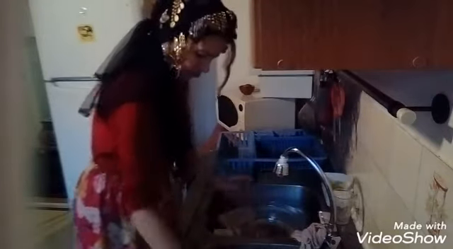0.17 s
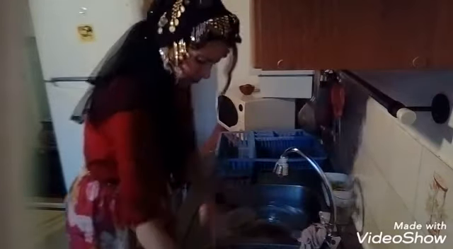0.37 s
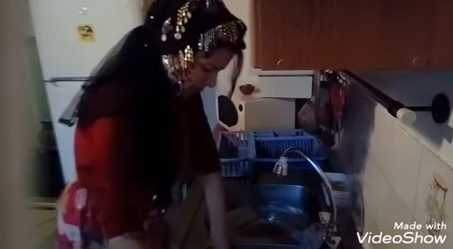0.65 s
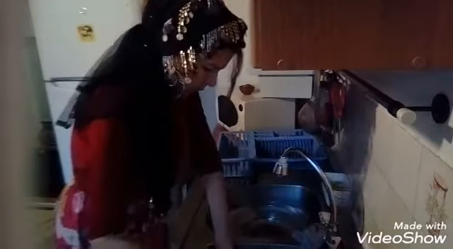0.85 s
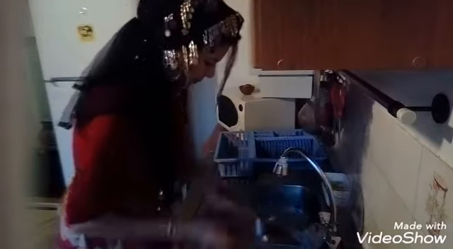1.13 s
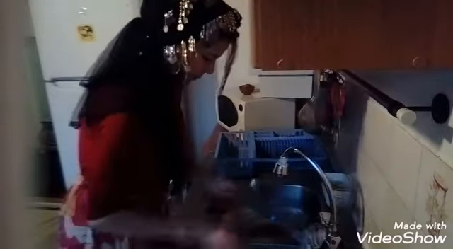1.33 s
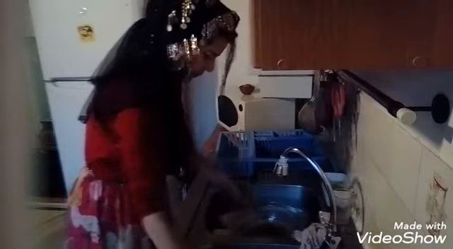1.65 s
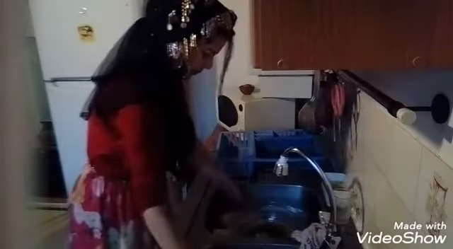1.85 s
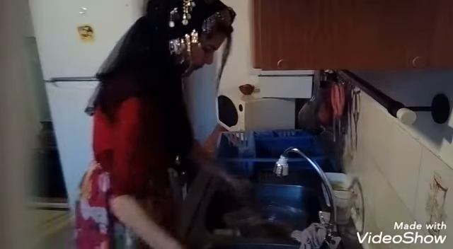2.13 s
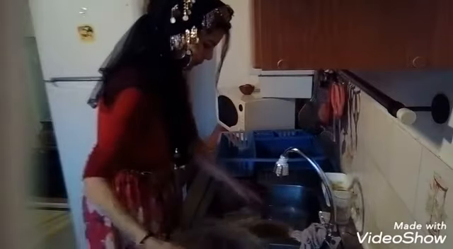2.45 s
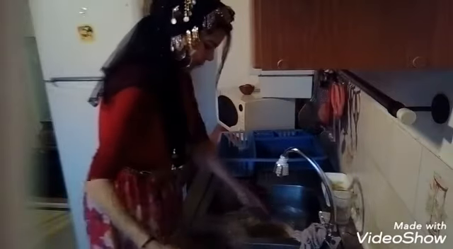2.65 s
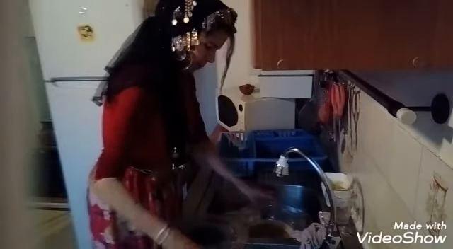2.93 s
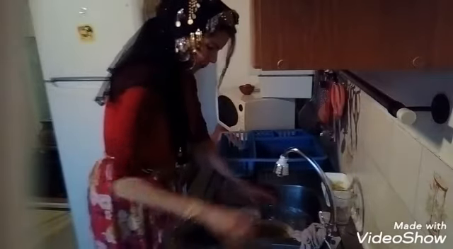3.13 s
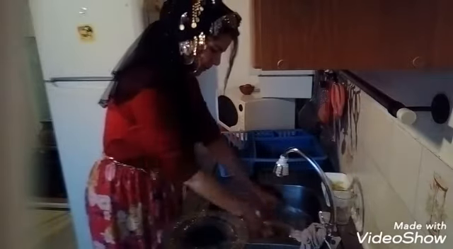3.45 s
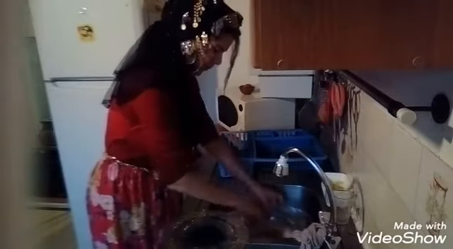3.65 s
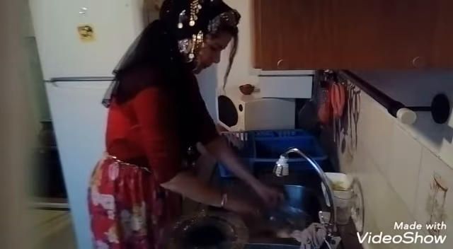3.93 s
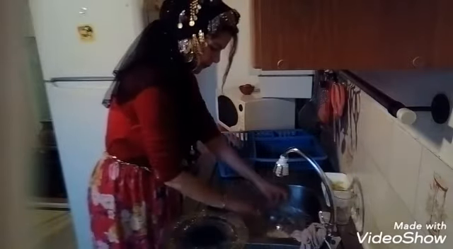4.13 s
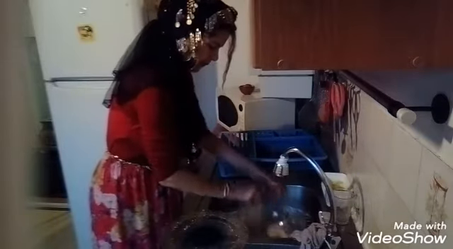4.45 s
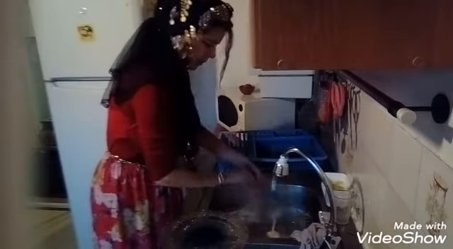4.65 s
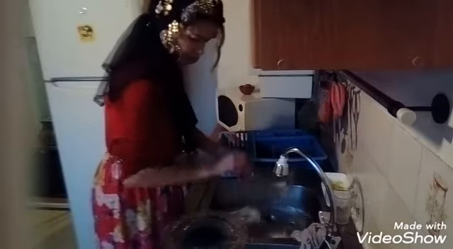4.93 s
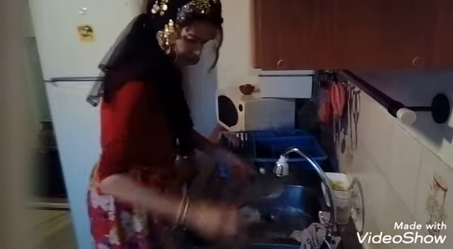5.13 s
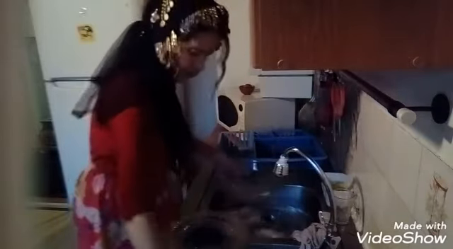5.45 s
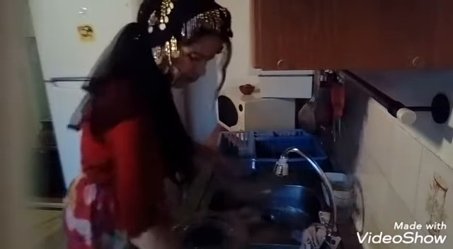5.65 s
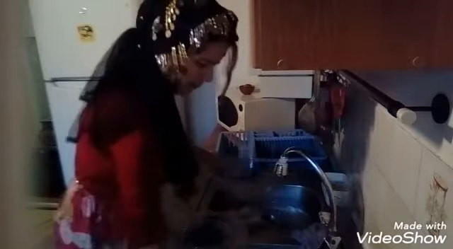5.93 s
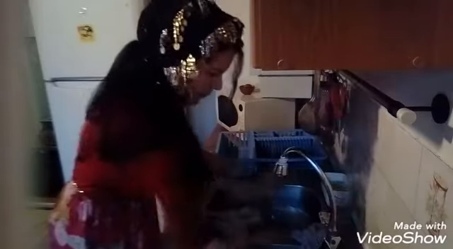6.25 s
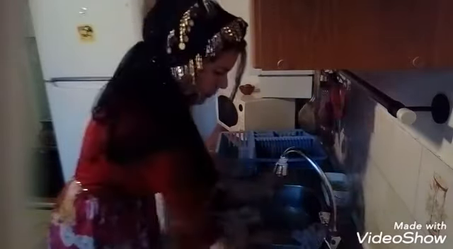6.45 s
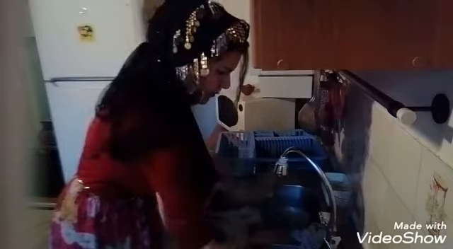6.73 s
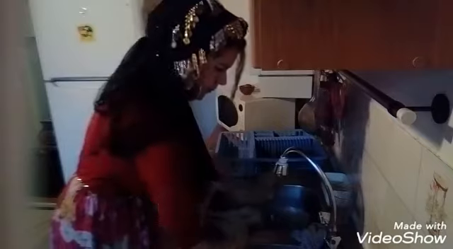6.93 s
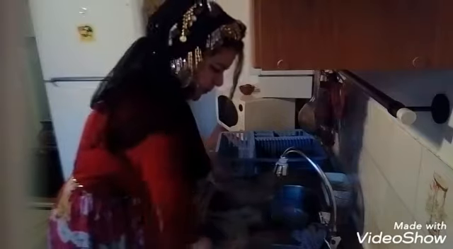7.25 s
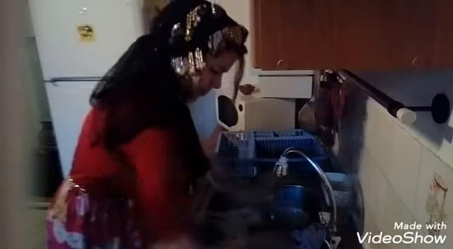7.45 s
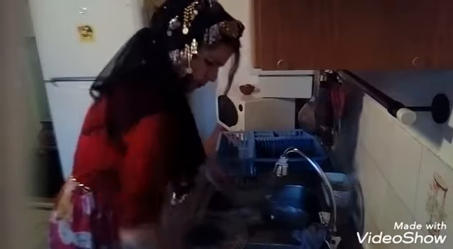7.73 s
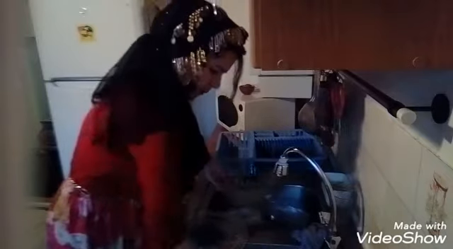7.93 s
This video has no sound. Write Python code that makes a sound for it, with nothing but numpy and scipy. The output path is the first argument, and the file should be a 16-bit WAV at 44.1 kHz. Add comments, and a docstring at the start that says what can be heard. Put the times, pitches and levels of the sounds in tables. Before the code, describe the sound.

Hand dishwashing in a small kitchen: sharp crashes and bright clinks in a metal basin, then muffled lid and cup knocks and quiet rubbing.

```python
"""Dishes are washed by hand in a metal sink in a small tiled kitchen.
Plates, a pot and cutlery are put down in clattering bursts: cracks of noise plus the ringing of each piece.
Light knocks and soft wiping follow, made of dull contacts and of countless tiny slips.
Fading noise makes the room ring briefly after every blow; a refrigerator hums underneath, as sine tones."""
import sys
import numpy as np
from scipy import signal
from scipy.io import wavfile
from scipy.ndimage import uniform_filter1d

SR = 44100
rng = np.random.default_rng(int(sys.argv[2]) if len(sys.argv) > 2 else 0)


def wav_record(signal):
    """Record a signal, one row per channel, as 16-bit PCM in the file named by sys.argv[1]."""
    frames = np.transpose(np.atleast_2d(signal))
    bounded = np.clip(frames, -1, 1)
    # unit amplitude maps onto the largest positive 16-bit level
    quanta = np.round(bounded * 32767).astype(np.int16)
    wavfile.write(sys.argv[1], SR, quanta)


N = 356328  # length in samples, about 8 s

# heavy ware dropped into the sink, where it rocks to rest;
# body shapes the first contact only, thud and ring also set the rebounds:
# start_s, level_db, basin_thud_db, body_hz, first_rebound_db (over level), piece, ring_db (over level)
HEAVY_DROPS = [(.007, -19, 12.5, 1130, -0.5, "plate", -9.5), (.206, -17, 11, 3600, -7, "saucer", -13.5),
               (2.842, -17.5, 14, 670, -5.5, "pot", -6), (3.075, -18, 13.5, 2980, -4, "pot", -20.5)]
# the wait before the first rebound, and the factor that shortens each further wait
REBOUND_S, REBOUND_SHRINK = 0.029, 0.8
# per rebound: level lost after the first one, and treble limit factor; the thud loss is the same for all
REBOUND_LOSS_DB, REBOUND_DULLING, REBOUND_THUD_LOSS_DB = 1, 0.64, 6


def drops(corner_hz=3900, dull_db=-0.5):
    """Each dropped piece cracks on the sink and rebounds three times, ringing anew at every contact."""
    out = np.zeros(N)
    for s, db, thud_db, body_hz, rebound_db, piece, ring_db in HEAVY_DROPS:
        first = blow(corner_hz, thud_db, crack_db=3.5, body_hz=body_hz, body_db=6.0,
                     crack_t60=0.058, push_db=21.5, tail_db=-7.5, clack_tail_db=-8)
        add(out, s, amp(db) * first)
        add(out, s, amp(db + ring_db) * ring(WARE_MODES[piece], spot_db=1.0))
        for k in range(3):
            # rebounds come sooner, weaker and duller one after another
            s += REBOUND_S * REBOUND_SHRINK ** k
            level = db + rebound_db - k * REBOUND_LOSS_DB
            contact = blow(corner_hz * REBOUND_DULLING ** (k + 1), thud_db - REBOUND_THUD_LOSS_DB,
                           crack_db=7.5, body_hz=1250, body_db=5.5, push_db=12,
                           tail_db=-6, clack_tail_db=-7, rise=0.0027)
            ringing = ring(WARE_MODES[piece], spot_db=-6.6)
            add(out, s, amp(level + dull_db) * contact + amp(level + ring_db) * ringing)
    return out


# crockery and pots set against each other or the sink:
# start_s, level_db, corner_hz (treble limit), basin_thud_db, body_hz, piece, ring_db (over the level)
FIRM_CLACKS = [(.541, -49, 7000, 10, 2930, "saucer", -20), (.69, -42.5, 3100, 21, 776, "basin", -13),
               (.716, -39, 5000, 13, 790, "basin", 6), (1.647, -20.5, 6000, 0, 2260, "glass", -11.5),
               (1.824, -24, 9100, 21, 2840, "basin", 2.5), (1.906, -20, 3000, 1.5, 850, "pot", -18.5),
               (1.985, -18.5, 3400, 11.5, 1280, "bowl", -7), (2.348, -24.5, 4070, -4, 526, "forks", -30),
               (2.466, -34.5, 3160, 2, 1500, "bowl", -5), (2.578, -30, 4500, 2, 2000, "saucer", -13.5),
               (2.824, -28.5, 3900, 29, 3750, "basin", -6.5), (5.438, -48, 5500, -3, 1500, "glass", -16),
               (5.452, -38, 4200, 14.5, 1050, "counter", 3), (6.114, -38, 950, 10, 650, "pan", -2.5),
               (7.46, -39.5, 2600, 7, 770, "counter", 1.5), (7.719, -51, 3000, 23, 754, "pot", -6),
               (8.003, -36, 775, 5, 420, "counter", 1)]


def clacks():
    """One firm contact, after which the piece rings on."""
    out = np.zeros(N)
    for s, db, corner_hz, thud_db, body_hz, piece, ring_db in FIRM_CLACKS:
        contact = blow(corner_hz, thud_db, crack_db=5.5, body_hz=body_hz, body_db=8, crack_t60=0.042,
                       shards_db=-6.5, noise_db=-6, push_db=15.5, tail_db=-5.5, clack_tail_db=-6.5)
        ringing = ring(WARE_MODES[piece], spot_db=1.5)
        add(out, s, amp(db) * (contact + amp(ring_db) * ringing))
    return out


# hard, bright contacts of cutlery:
# start_s, level_db (before the trim), basin_thud_db, body_hz, piece, ring_db (over the level)
CUTLERY_HITS = [(0.656, -48.5, -6, 2200, "glass", -18), (0.731, -49, 20, 4100, "forks", -3.5),
                (.821, -31, -16, 2400, "glass", -6), (.927, -43, -5, 1890, "spoon", -12),
                (1.33, -40, -16, 3200, "spoon", 5), (1.427, -55.5, -10, 4520, "spoon", 7),
                (1.761, -20, 11.5, 1430, "spoon", -7.5), (2.14, -33, 23.5, 4170, "forks", 0.5),
                (2.183, -26.5, 10.5, 4540, "forks", -1), (2.216, -25.5, 5, 2520, "forks", 0.5),
                (2.424, -34.5, 3, 1080, "forks", -14), (2.498, -40.5, 19, 2830, "saucer", 1.5)]


def cutlery(trim_db=-3.0, glint_db=-25, glint_t60=0.087):
    """Hard contacts keep most of their treble, and set the highest modes of thin steel glinting."""
    out = np.zeros(N)
    for s, db, thud_db, body_hz, piece, ring_db in CUTLERY_HITS:
        contact = blow(corner_hz=12000, thud_db=thud_db, crack_db=5, body_hz=body_hz, body_db=7,
                       push_db=22, tail_db=-1.5)
        glint = shards(count=len(contact), low_hz=7800, high_hz=15100, t60=glint_t60, size=9)
        contact += amp(glint_db) * glint
        ringing = ring(WARE_MODES[piece], spot_db=4.5, damping=1.06, chatter=1.0)
        add(out, s, amp(db + trim_db) * (contact + amp(ring_db) * ringing))
    return out


# cutlery sliding over the plates, loudness joined from point to point: time_s, level_db
SLIDE_LEVEL = [(2.15, -29.5), (2.24, -45), (2.3, -40.5), (2.43, -70), (2.53, -53), (2.6, -40),
               (2.67, -51.5), (2.74, -57)]


def sliding(contacts_per_s=140, spread_db=4, clack_db=-2, top_hz=5000):
    """Small irregular contacts keep the cutlery and crockery chattering."""
    s, db = np.transpose(SLIDE_LEVEL)
    t = np.arange(s[0], s[-1], 1 / SR)
    rattle, out = np.zeros(len(t)), np.zeros(N)
    for piece in ("forks", "saucer", "plate"):
        happens = rng.random(len(t)) < contacts_per_s / SR
        strength = rng.standard_normal(len(t)) * amp(spread_db * rng.standard_normal(len(t)))
        touch = ring(WARE_MODES[piece])[:4000] + amp(clack_db) * 2 * shards(count=4000)
        rattle += signal.oaconvolve(happens * strength, touch)[:len(t)]
    rattle = colour(rattle, lambda hz: 1 / np.sqrt(1 + (hz / top_hz) ** 6))
    # even out the loudness, so that the table alone sets it
    power = uniform_filter1d(rattle ** 2, size=3000).clip(0)
    rattle /= np.sqrt(power + 1e-3 * rms(rattle) ** 2)
    add(out, s[0], rattle * np.interp(t, s, amp(db)))
    return out


# soft knocks of ware turned in the hands:
# start_s, level_db (before the trim), basin_thud_db, body_hz, piece
SOFT_KNOCKS = [(3.41, -51, 20.5, 1400, "lid"), (3.562, -49, 20, 418, "lid"),
               (3.61, -40.5, 14.5, 1130, "lid"), (3.954, -64, 36.5, 510, "lid"),
               (3.992, -45, -2, 1140, "lid"), (4.095, -37, 2.5, 1160, "lid"),
               (4.161, -36.5, 11, 1220, "lid"), (4.373, -35.5, 9.5, 1170, "lid"),
               (4.441, -38, 0, 700, "lid"), (4.49, -48, 18, 590, "glass"), (4.69, -45.5, 15, 1500, "cup"),
               (4.739, -39.5, 6.5, 1020, "cup"), (5.661, -47, 17.5, 450, "lid"),
               (5.992, -50, 24, 466, "pan")]


def knocks(trim_db=-0.5, ring_db=-9):
    """Cushioned contacts: dull, with only a little ring."""
    out = np.zeros(N)
    for s, db, thud_db, body_hz, piece in SOFT_KNOCKS:
        contact = blow(corner_hz=955, thud_db=thud_db, crack_db=7.5, body_hz=body_hz, body_db=2,
                       push_db=12, tail_db=-0.5)
        add(out, s, amp(db + trim_db) * (contact + amp(ring_db) * ring(WARE_MODES[piece])))
    return out


# weight landing on the basin or the counter: start_s, level_db (before the trim), panel (what booms)
PANEL_THUMPS = [(.007, -19.5, "basin"), (.258, -24, "basin"), (0.82, -36.5, "basin"), (1.856, -18, "basin"),
                (5.453, -41, "basin"), (6.991, -38.5, "counter"), (7.373, -42.5, "counter"),
                (8.039, -35, "counter")]


def thumps(trim_db=-1, contact_db=-14):
    """The low boom of a large panel, under a weak, dull contact."""
    out = np.zeros(N)
    for s, db, panel in PANEL_THUMPS:
        contact = blow(corner_hz=1100, thud_db=-0.5, crack_db=14.5, body_hz=800, body_db=3, push_db=12)
        boom = ring(WARE_MODES[panel], spot_db=0.2)
        add(out, s, amp(db + trim_db) * (boom + amp(contact_db) * contact))
    return out


# ware shifting in the grip: start_s, length_s, level_db
GRIP_SHUFFLES = [(2.42, 0.16, -38.5), (3.601, 0.47, -60), (4.371, 0.2, -43), (4.597, 0.21, -51.5)]


def shuffling(contacts_per_s=70, spread_db=3):
    """Ware shifts in the hands: a scatter of tiny cushioned contacts that swells and fades."""
    out = np.zeros(N)
    for s, length, db in GRIP_SHUFFLES:
        t = np.arange(0, length, 1 / SR)
        happens = rng.random(len(t)) < contacts_per_s / SR
        strength = amp(spread_db * rng.standard_normal(len(t))) * rng.choice([-1, 1], len(t))
        swell = np.sin(np.pi * t / length)
        touch = blow(corner_hz=1080, thud_db=12.5, crack_db=14, body_hz=800, body_db=-1.5)
        patter = signal.oaconvolve(happens * strength * swell, touch)
        add(out, s, amp(db) * patter / rms(patter[:len(t)]))
    return out


# pressure of a hand wiping wet ware, joined from point to point: time_s, level_db (before the trim)
WIPE_LEVEL = [(6.15, -59), (6.42, -59), (6.62, -52.5), (6.9, -59), (7.11, -53.5), (7.24, -61), (7.5, -56.5),
              (8.07, -61)]
# tone of the wiping: pitch_hz, level_db (relative, per Hz)
WIPE_TONE = [(200, 1), (700, -1), (1400, 2), (2700, -0.5), (4000, -6), (6500, -12.5), (7800, -36),
             (15000, -45)]
STROKES_PER_S, STROKE_DB = 9.7, 0.5  # the pressure varies from one short stroke to the next


def wiping(trim_db=-1, slips_per_s=2500, spread_db=2.5, wet=0.73):
    """Countless tiny slips under the hand, in uneven strokes, blurred by the room."""
    strength = rng.standard_normal(N) * amp(spread_db * rng.exponential(1, N).clip(0, 4))
    slips = strength * (rng.random(N) < slips_per_s / SR)
    room = wash(count=20000)
    slips = slips + wet * signal.oaconvolve(slips, room / np.linalg.norm(room))[:N]
    hiss = colour(slips, lambda hz: amp(read(WIPE_TONE, hz)))
    s, db = np.transpose(WIPE_LEVEL)
    t, pushes = np.arange(N) / SR, rng.standard_normal(size=200)
    strokes = amp(STROKE_DB * np.interp(t * STROKES_PER_S, np.arange(len(pushes)), pushes))
    pressure = np.interp(t, s, amp(db + trim_db), left=0)
    return hiss / rms(hiss) * strokes * pressure


# the wiping hand makes the pot sing faintly: start_s, length_s, level_db
POT_RUBS = [(7.537, 0.28, -57.5)]


def rubbing(corner_hz=900):
    """Friction under the hand feeds the pot's low modes."""
    out = np.zeros(N)
    for s, length, db in POT_RUBS:
        t = np.arange(0, length, 1 / SR)
        # friction noise, strongest around the corner pitch
        drag = colour(rng.standard_normal(len(t)), lambda hz: hz / corner_hz / (1 + (hz / corner_hz) ** 4))
        swell = np.sin(np.pi * t / length)
        song = signal.oaconvolve(drag * swell, ring(WARE_MODES["pot"], spot_db=2, chatter=0.25))
        add(out, s, amp(db) * song / rms(song[:len(t)]))
    return out


# the sink's tone when loaded with dishes: pitch_hz, level_db (relative, per Hz)
SINK_TONE = [(25, -22), (45, -26), (80, -10), (135, -1.5), (220, 0.5), (450, -4.5), (610, -4.5), (700, -13),
             (810, -5), (1040, -8.5), (1400, -3.5), (2400, -9.5), (4200, -14.5), (6400, -18), (7400, -35),
             (15000, -35)]


def blow(corner_hz, thud_db, crack_db, body_hz, body_db, crack_t60=0.057, basin_hz=340, sag=0.18,
         push_db=17, push_s=0.00036, body_width=0.21, shards_db=-5, noise_db=-2, tail_db=-6.0,
         clack_tail_db=-5.5, rise=0.0006, count=22000):
    """A short crack, a clack and the room's tail; soft contacts lose treble, heavy ones flex the basin."""
    t = np.arange(count) / SR
    clack, room = shards(count=8000), wash(count)
    crack = rng.standard_normal(count) * amp(noise_db - 60 * t / crack_t60)
    add(crack, 0, amp(shards_db) * clack)
    # the room holds on to the clack's pitches
    clack_tail = signal.fftconvolve(room, clack / np.linalg.norm(clack))[:count]
    tail = amp(tail_db) * room + amp(clack_tail_db) * clack_tail
    drive = (amp(crack_db) * crack + tail) * (1 - np.exp(-t / rise))
    # the first contact is one smooth shove on the sheet metal
    drive -= amp(push_db + crack_db) * t / push_s * np.exp(-t / push_s) / (push_s * SR)
    flex_hz = basin_hz / amp(sag * thud_db)  # a heavier thud moves more of the basin, and sounds lower

    def gain(hz):
        contact = 1 / (1 + (hz / corner_hz) ** 4)
        flex = 1 + amp(thud_db) ** 2 / (1 + (hz / flex_hz) ** 4)
        body = body_db * np.exp(-.5 * (np.log((hz + 1) / body_hz) / body_width) ** 2)
        return amp(read(SINK_TONE, hz) + body) * np.sqrt(contact * flex)
    return colour(drive, gain) * np.sqrt(SR / 4000)


# the modes (own pitches) of each named piece or panel:
# pitch_hz, level_db (relative), decay_s (time to fall 60 dB, before ring() divides it by its damping)
WARE_MODES = { "plate": [(1200, -7, .2), (2433, -15, .25), (2794, 0, .33), (3753, -5, .38), (4134, -15, .3),
              (4511, -9, .28), (5555, -24, .35), (6228, -21, .25), (8236, -36, .2)],
              "saucer": [(2584, -9, .3), (2804, -1, .38), (3391, -11, .15), (3832, 0, .38), (3868, -4, .35),
              (4519, -11, .35), (5883, -20, .35), (6282, -15, .28)], "spoon": [(2791, 0, .33),
              (3195, -3, .2), (3870, -4, .12), (4484, -10, .22), (5243, -7, .25), (6527, -10, .25),
              (7641, -16, .17), (10860, -23, .15), (14290, -13, .08)], "forks": [(1162, -5, .15),
              (1641, -7, .15), (2579, -1, .28), (2609, -4, .33), (3979, 0, .22), (4375, -5, .25),
              (5246, -14, .2), (5890, -16, .28), (6526, -7, .16), (7848, -19, .18), (8440, -21, .12),
              (9650, -23, .13), (14310, -23, .1)], "pot": [(328, -1, .3), (804, 0, .4), (1443, -4, .28),
              (2107, -9, .25), (2282, -9, .25), (2460, -11, .2), (2885, -13, .28)], "bowl": [(863, -3, .28),
              (1493, 0, .33), (2609, -3, .45), (4419, -20, .3), (5937, -29, .25)],
              "lid": [(277, 10.5, 0.43), (906, 0.5, .12), (1182, 9, 0.14), (1498, 1.5, 0.11),
              (2270, -5, 0.16)], "cup": [(934, -1, 0.077), (1506, -2, 0.34), (2260, -7, 0.4),
              (2680, -11, .2)], "glass": [(2055, 8.5, 0.066), (2947, 3, 0.047)], "pan": [(457, 1, 0.21),
              (506, 1.5, .35), (760, -0.5, 0.23), (964, -2, 0.2)], "counter": [(80.4, 0.5, 0.099),
              (126.3, -2, 0.23), (183, -2, 0.17)], "basin": [(83, -14, .3), (135, -8, .22), (178, -3, .28),
              (221, 0, .33), (322, -7, .22), (382, -12, .22)], }


def ring(modes, wet=0.53, spot_db=-1.5, damping=1.24, chatter=0.68, chatter_per_s=160,
         count=22000, size=3000):
    """A struck piece: its modes die away, chatter against their neighbours and beat with reflections."""
    hz, db, t60 = np.transpose(modes)[:, :, None]
    t = np.arange(count) / SR
    # random changes of strength and phase, one wandering line for each mode
    knots = rng.standard_normal(size=(len(hz), 200, 2))
    jolts = np.array([np.interp(t * chatter_per_s, np.arange(len(row)), row[:, 0] + 1j * row[:, 1])
                      for row in knots])
    swing = ((1 + chatter * jolts) * np.exp(2j * np.pi * hz * t)).imag
    direct = amp(-60 * t * damping / t60) * swing
    direct *= 1 - np.exp(-t * hz)  # each mode swings up within about a cycle
    room = wash(count)
    reflected = signal.fftconvolve(direct, room[None] / np.linalg.norm(room), axes=1)[:, :count]
    heard = direct + wet * reflected
    heard /= np.linalg.norm(heard, axis=1, keepdims=True)
    # the spot that is hit favours some modes over others
    sound = (heard * amp(db + spot_db * rng.standard_normal(hz.shape))).sum(0)
    return sound / np.linalg.norm(sound) * np.sqrt(size)  # every ring has the same energy


def shards(count, low_hz=260, high_hz=9000, t60=0.063, size=44):
    """Many short, unrelated modes of things that lie on one another."""
    pitch, strength, phase = rng.random((3, size, 1))
    # the modes lie further apart, and are stronger, towards the treble
    low, high = np.sqrt(low_hz), np.sqrt(high_hz)
    hz = (low + (high - low) * (np.arange(size)[:, None] + pitch) / size) ** 2
    t = np.arange(count) / SR
    modes = (np.sqrt(hz) ** .5 * (.5 + strength) * np.sin(2 * np.pi * (hz * t + phase))).sum(0)
    return modes / rms(modes) * amp(-60 * t / t60)


# how long the kitchen rings: pitch_hz, decay_s (time to fall 60 dB)
ROOM_DECAY = [(100, 0.6), (260, 0.38), (700, 0.49), (1800, 0.46), (5000, 0.37), (12000, 0.18)]


def wash(count, size=512):
    """Dense reflections that start at unit level, each band dying at the kitchen's speed."""
    hz, t, z = signal.stft(rng.standard_normal(count), SR, nperseg=size)
    fading = z * amp(-60 * t / read(ROOM_DECAY, hz)[:, None])
    return signal.istft(fading, SR, nperseg=size)[1][:count]


# steady background noise, mostly low, with a thin band of noise near 15 kHz:
# pitch_hz, level_db (relative, per Hz)
BACKGROUND_TONE = [(25, -19.5), (45, -19), (80, -8), (140, -2.5), (220, -8.5), (320, -18.5), (600, -26),
                   (1500, -29), (3500, -32.5), (6600, -37.5), (7400, -44), (8300, -84), (14000, -68.5),
                   (15000, -40)]
BACKGROUND_DB = -52  # overall level of that noise
# the refrigerator's hum: pitch_hz, level_db
FRIDGE_HUM = [(139, -56.5), (441, -67)]


def kitchen(waver=0.11):
    """Steady background noise and a slightly wavering refrigerator hum."""
    noise = colour(rng.standard_normal(N), lambda hz: amp(read(BACKGROUND_TONE, hz)))
    t, knots = np.arange(N) / SR, np.linspace(0, N / SR, num=60)
    hum = np.zeros(N)
    for hz, db in FRIDGE_HUM:
        strength = np.interp(t, knots, 1 + waver * rng.standard_normal(len(knots)))
        hum += amp(db) * np.sqrt(2) * np.sin(2 * np.pi * hz * t) * strength
    return amp(BACKGROUND_DB) * noise / rms(noise) + hum


def amp(db):
    """Decibels to gain."""
    return 10 ** (np.asarray(db) / 20)


def rms(x):
    """Root mean square: the average strength of a sound."""
    return np.sqrt(np.mean(x ** 2) + 1e-20)


def read(points, hz):
    """A table of pitch_hz and value, joined on a log-frequency axis."""
    f, value = np.transpose(points)
    return np.interp(np.log(hz + 1), np.log(f), value)


def add(mix, s, sound):
    """Lays a sound into the mix at time s, in seconds."""
    part = mix[max(round(s * SR), 0):][:len(sound)]
    part += sound[:len(part)]


def colour(x, gain, size=4096):
    """Causal filter with the magnitude gain(hz), so that attacks stay sharp."""
    log_gain = np.log(gain(abs(np.fft.fftfreq(size, 1 / SR))) + 1e-6)
    taps = np.fft.ifft(np.exp(np.conj(signal.hilbert(log_gain)))).real
    return signal.oaconvolve(x, taps[:size // 2])[:len(x)]


def scene(width_db=-37, width_hz=1500):
    """Everything is heard from the middle, with only a trace of width, mostly in the treble."""
    mono = drops() + clacks() + cutlery() + knocks() + thumps()
    mono += shuffling() + rubbing() + sliding() + wiping() + kitchen()
    scatter = rng.standard_normal(size=3000)
    side = amp(width_db) * signal.oaconvolve(mono, scatter / np.linalg.norm(scatter))[:N]
    side = colour(side, lambda hz: np.sqrt(1 + (np.minimum(hz, 6000) / width_hz) ** 2))  # lift the treble
    return np.array([mono + side, mono - side])


EDGE_HZ = 15600  # nothing much is heard above this


def record(dry, ceiling=0.73):
    """The loudest peaks are rounded off; then a low-pass filter removes the extreme treble."""
    rounded = ceiling * np.tanh(dry / ceiling)
    low_pass = signal.firwin(511, EDGE_HZ, window=("kaiser", 9), fs=SR)
    return signal.oaconvolve(rounded, low_pass[None], "same")


dry = scene()
out = record(dry)
wav_record(out)
```